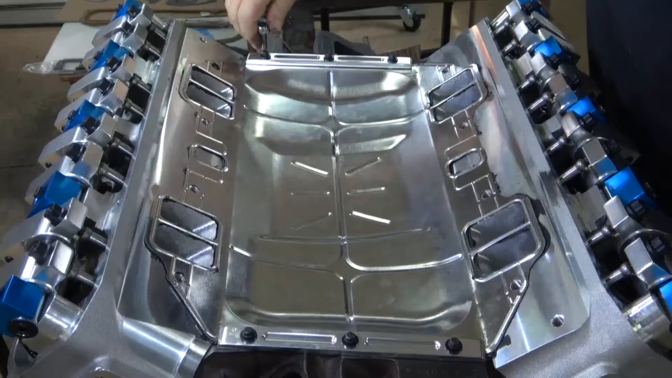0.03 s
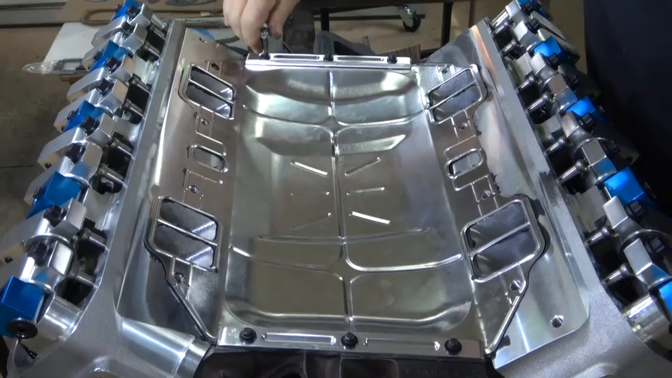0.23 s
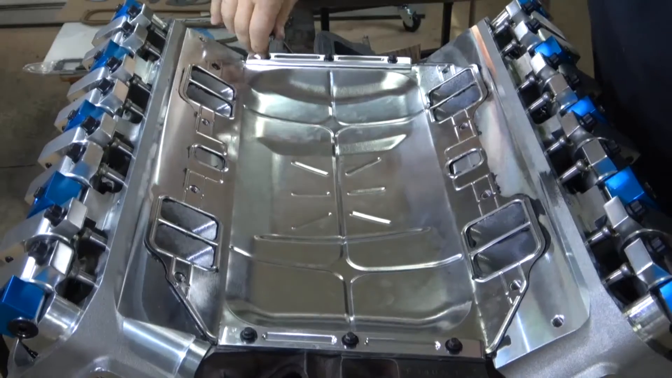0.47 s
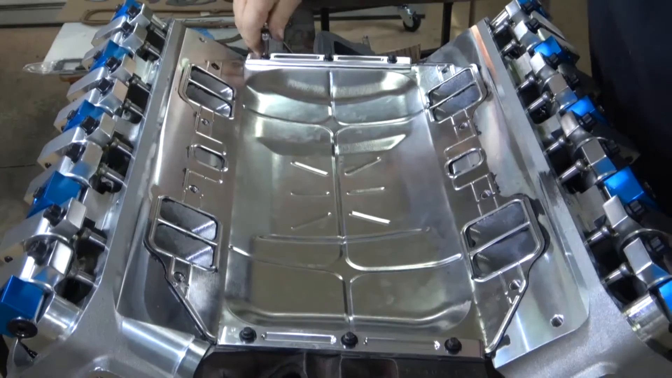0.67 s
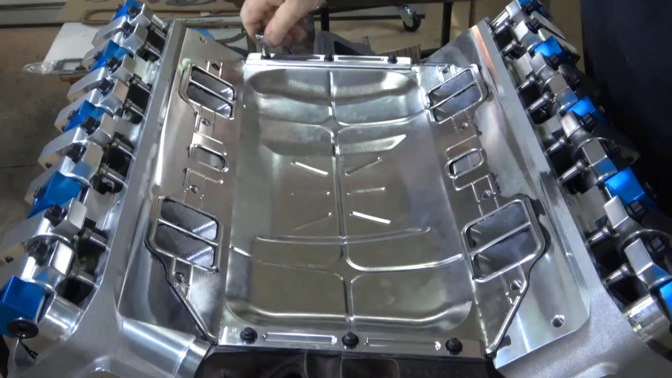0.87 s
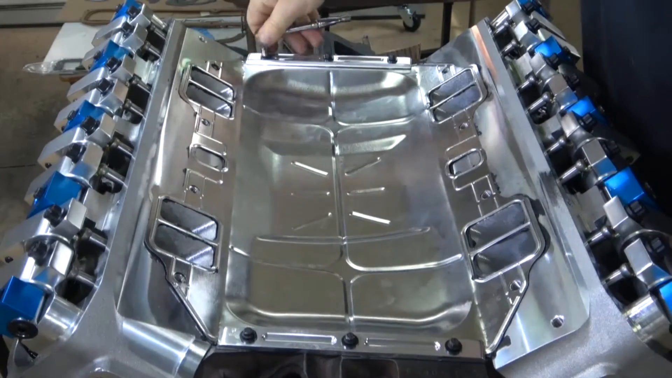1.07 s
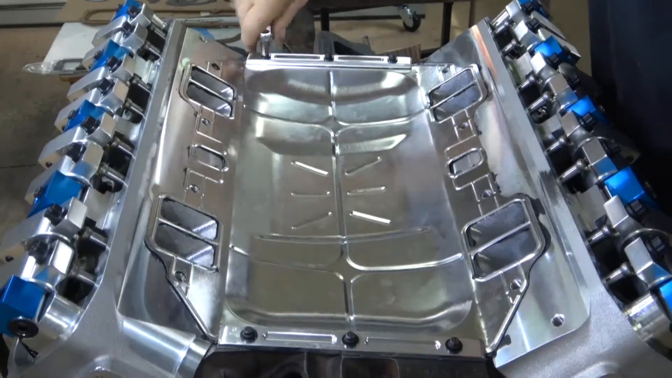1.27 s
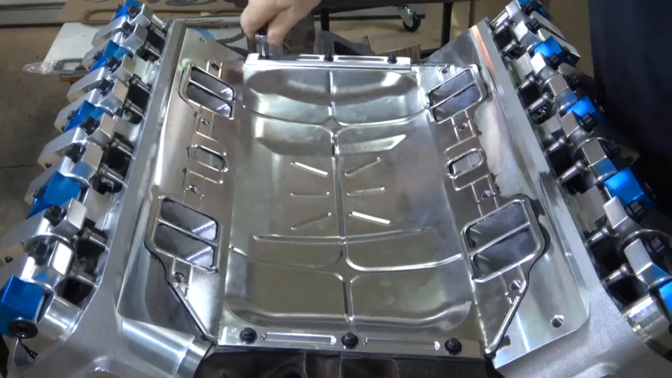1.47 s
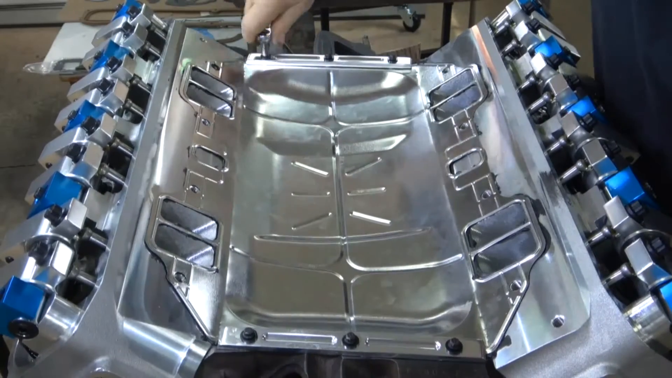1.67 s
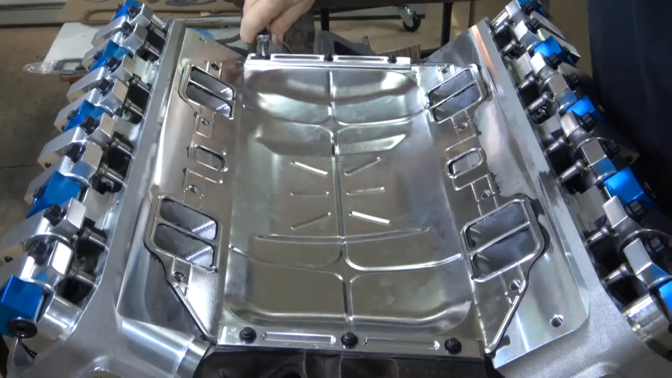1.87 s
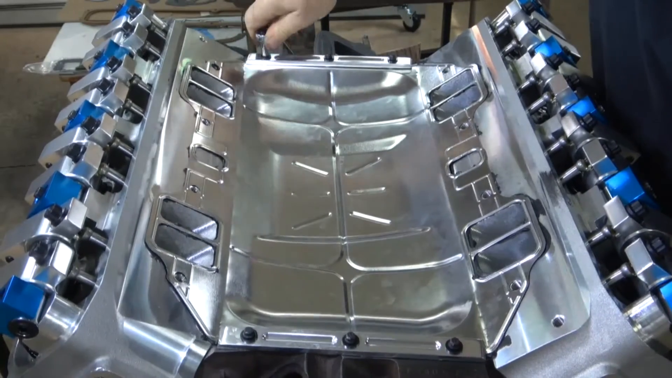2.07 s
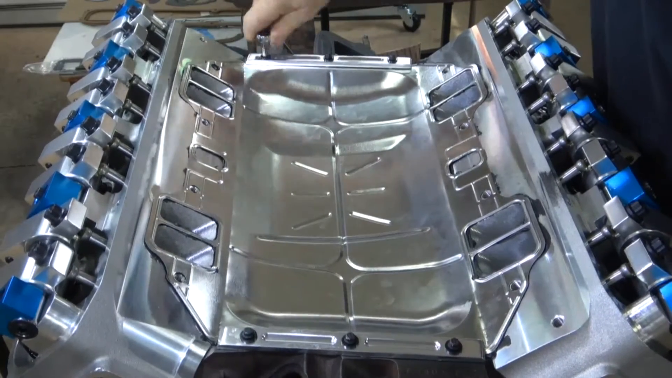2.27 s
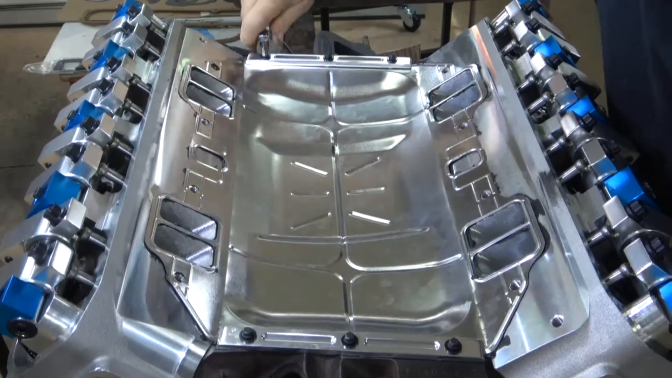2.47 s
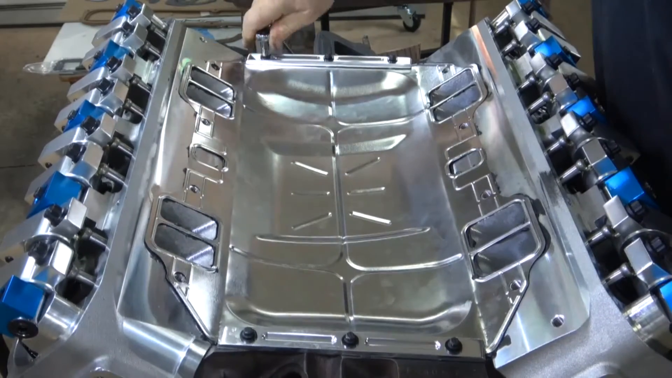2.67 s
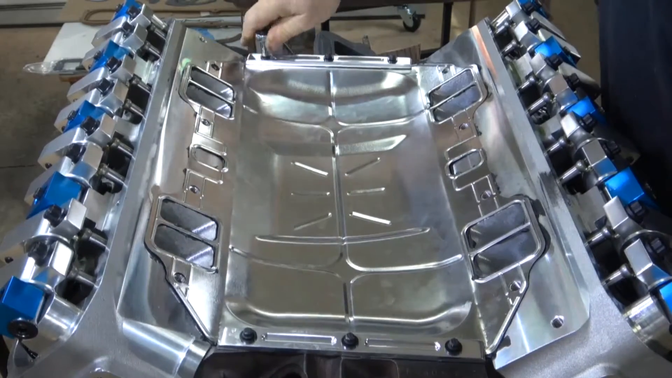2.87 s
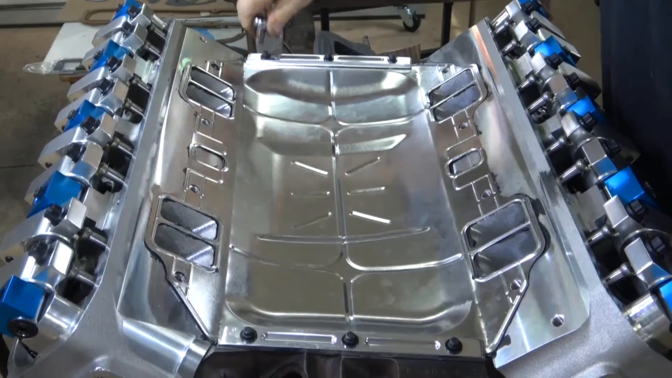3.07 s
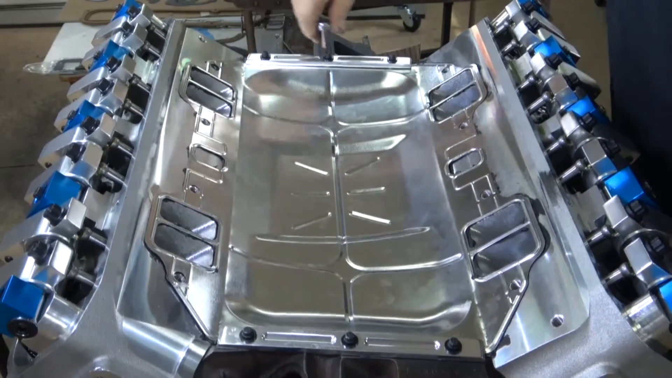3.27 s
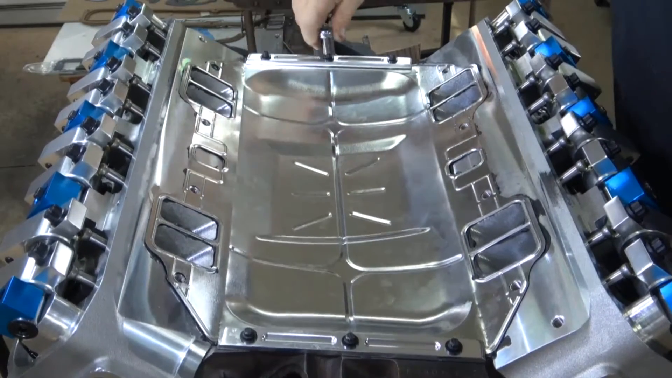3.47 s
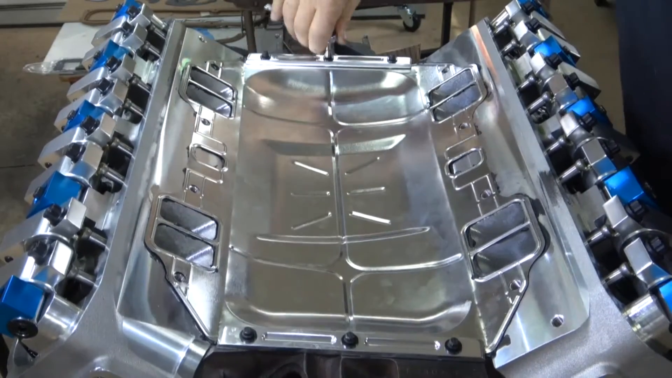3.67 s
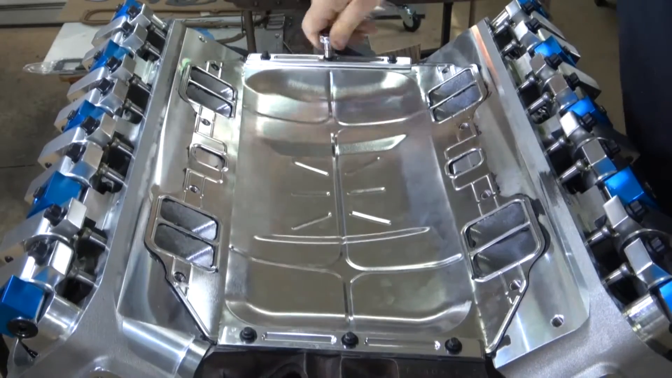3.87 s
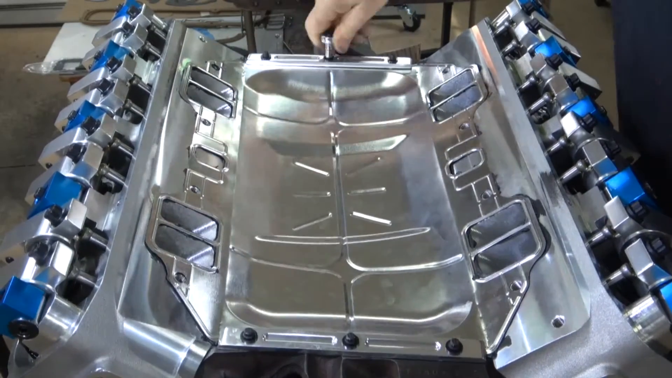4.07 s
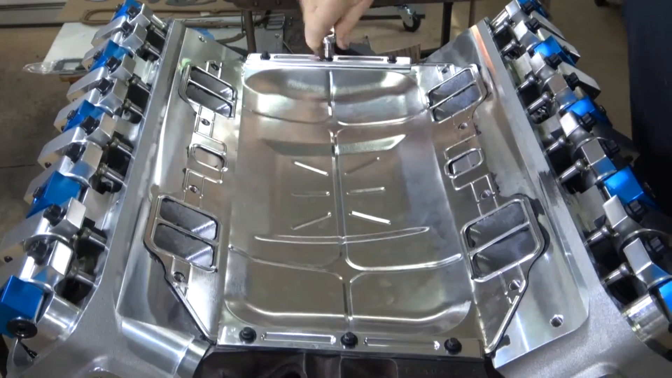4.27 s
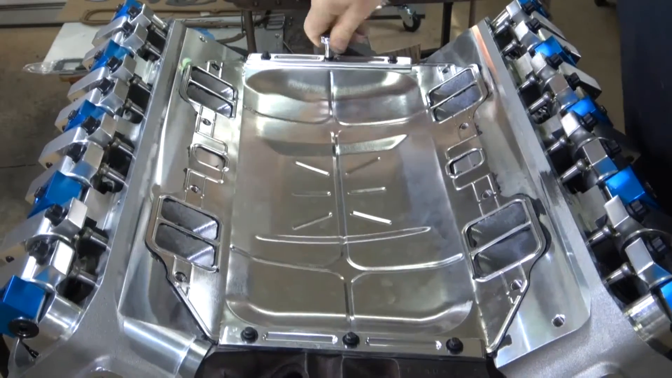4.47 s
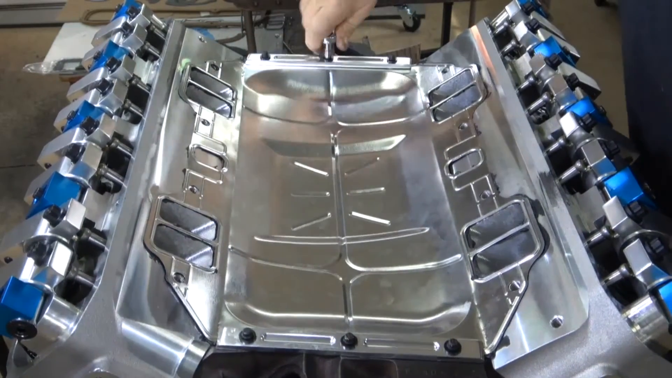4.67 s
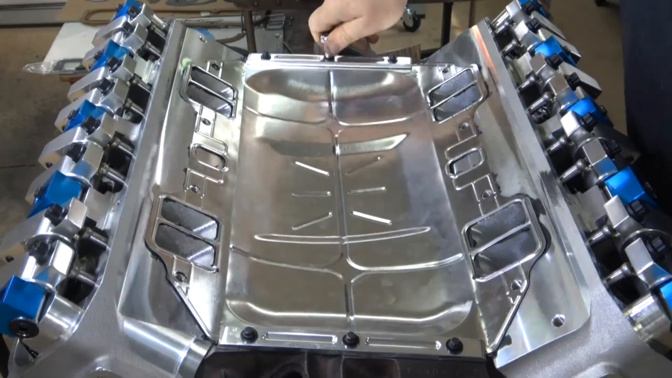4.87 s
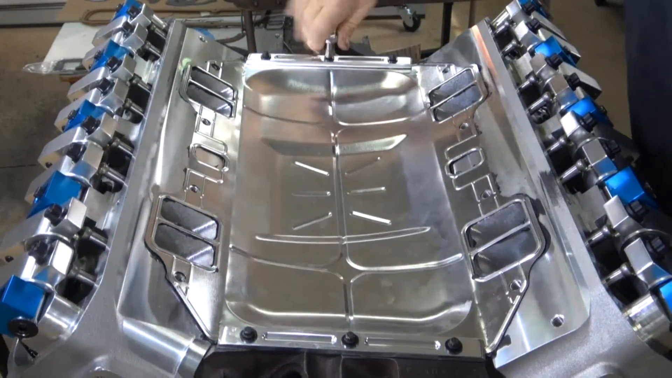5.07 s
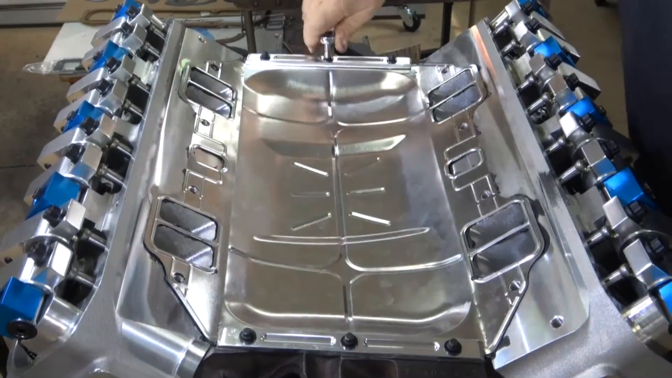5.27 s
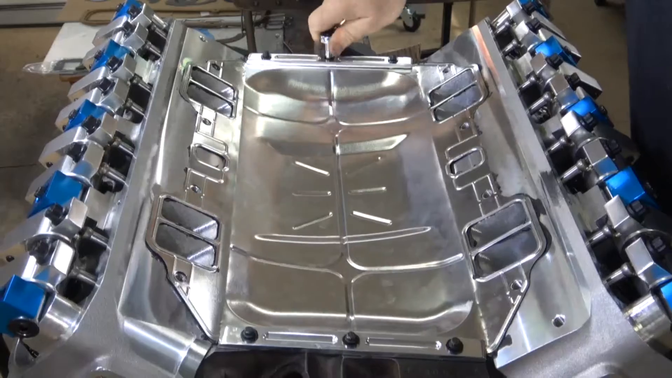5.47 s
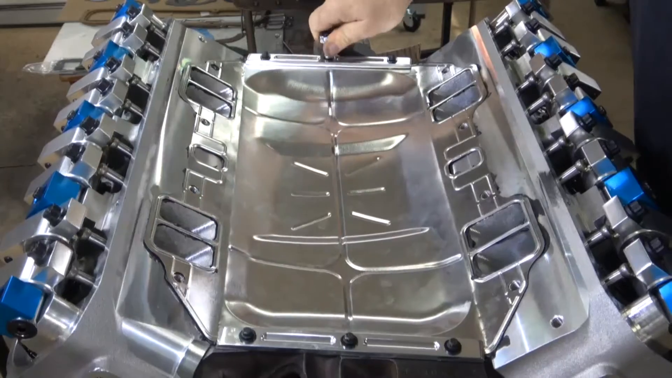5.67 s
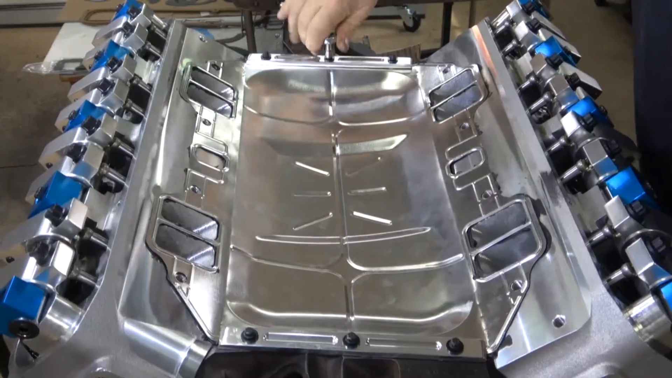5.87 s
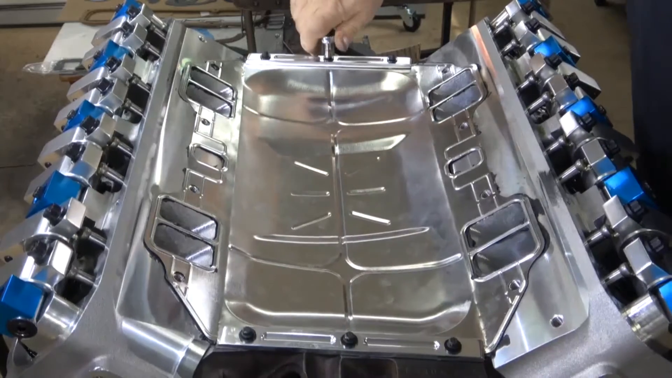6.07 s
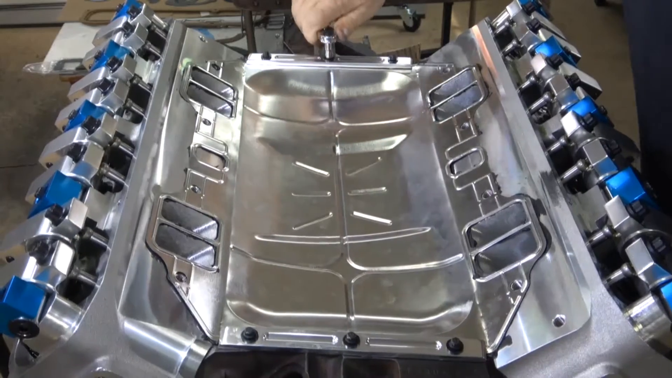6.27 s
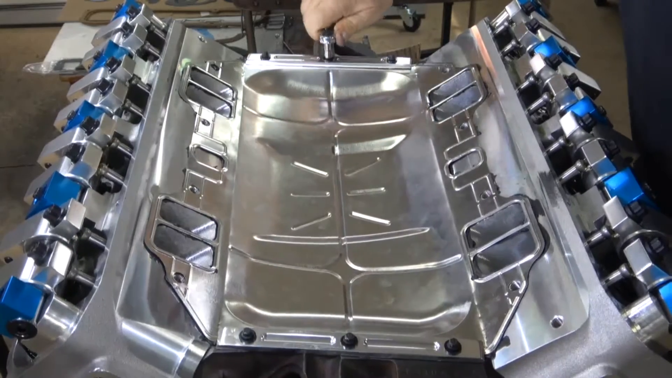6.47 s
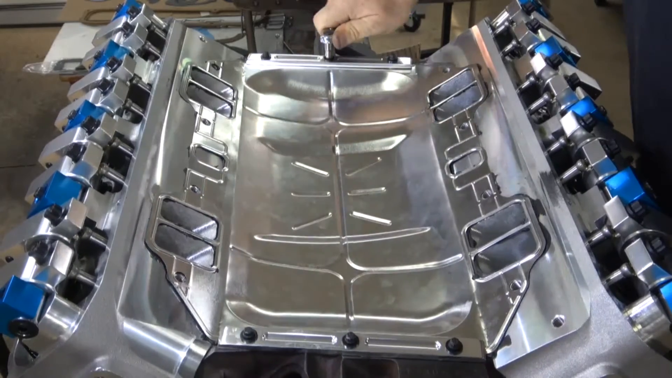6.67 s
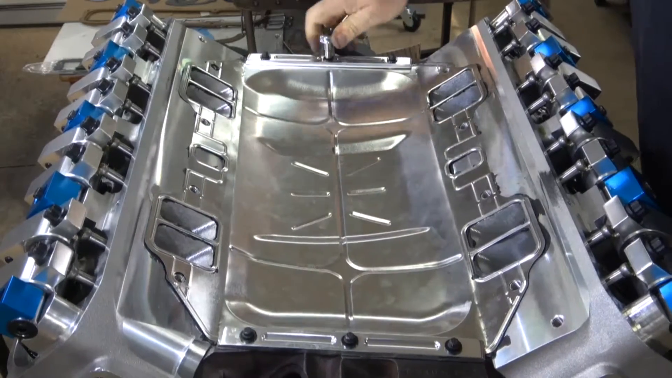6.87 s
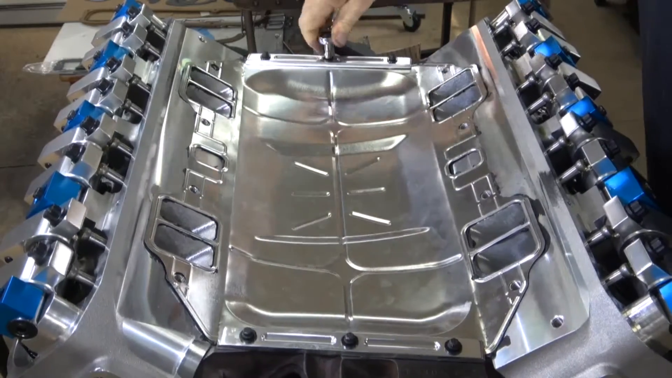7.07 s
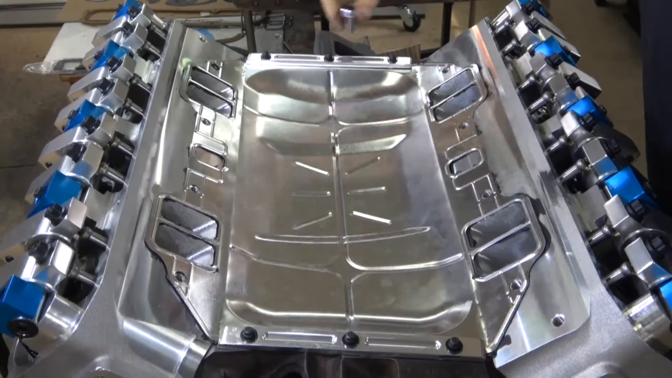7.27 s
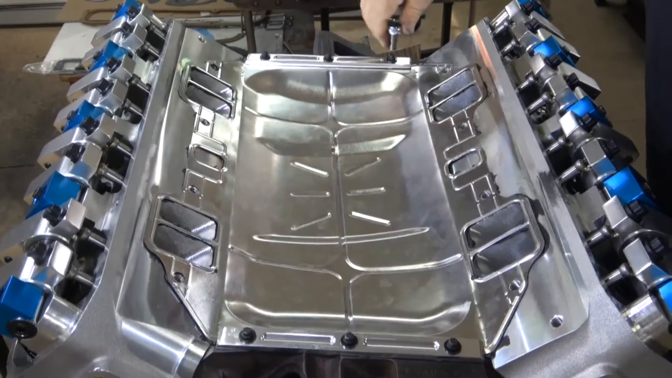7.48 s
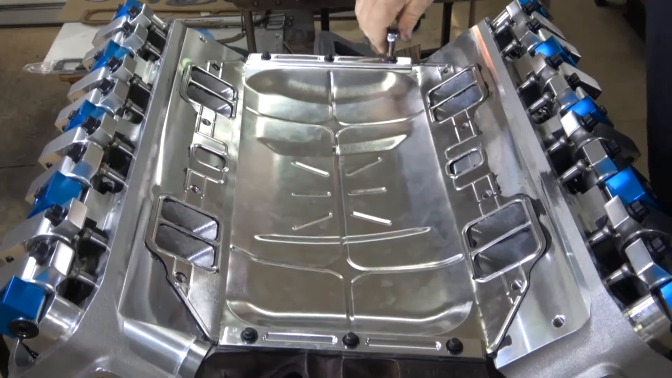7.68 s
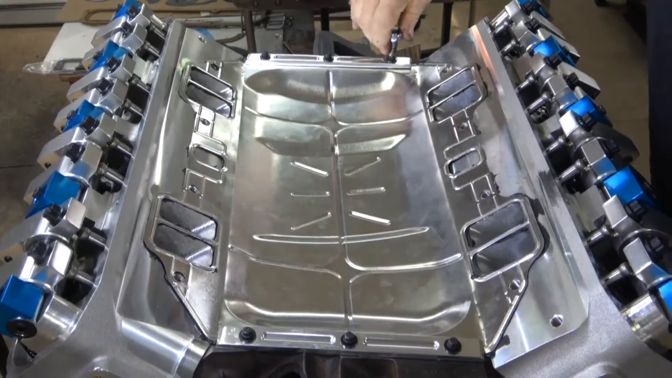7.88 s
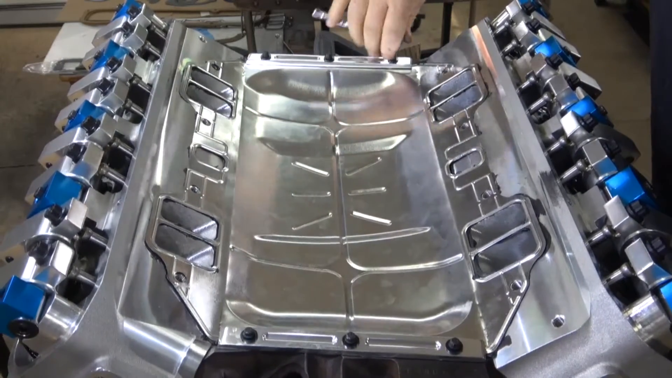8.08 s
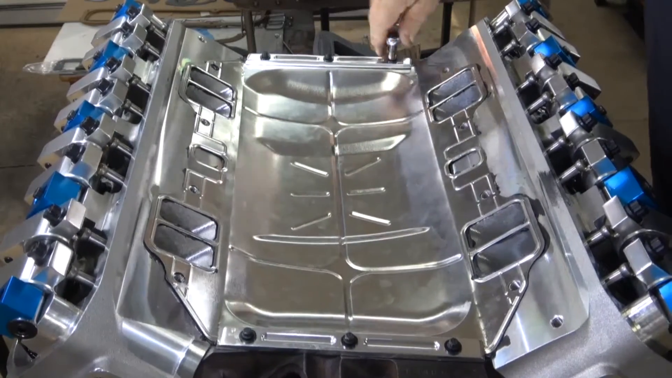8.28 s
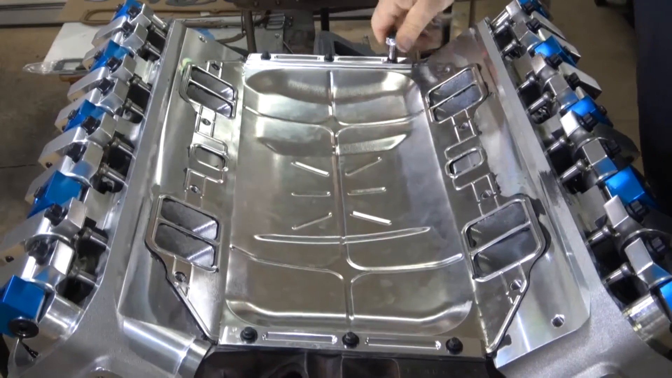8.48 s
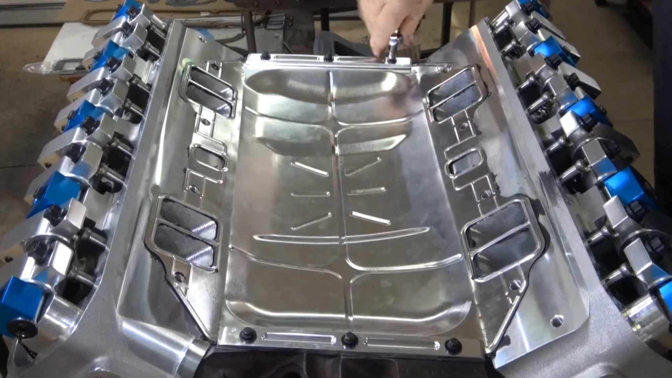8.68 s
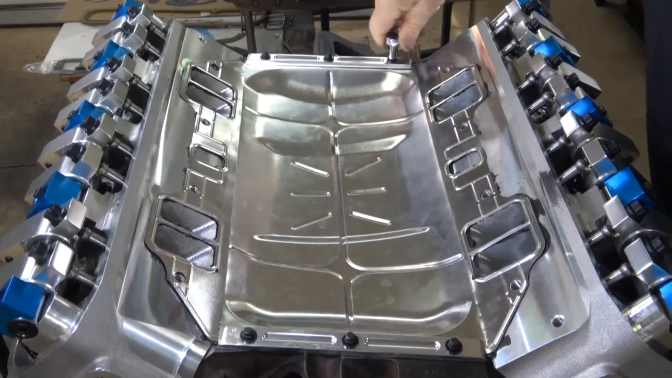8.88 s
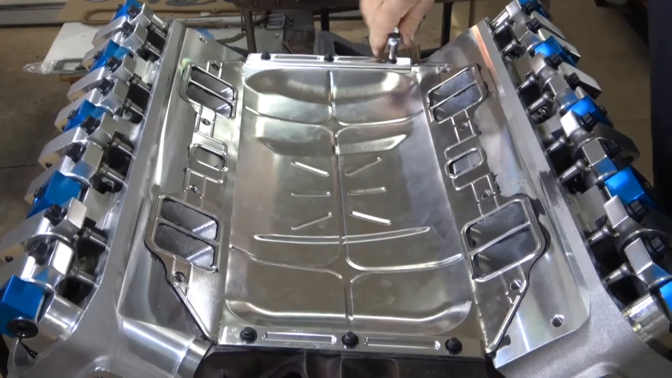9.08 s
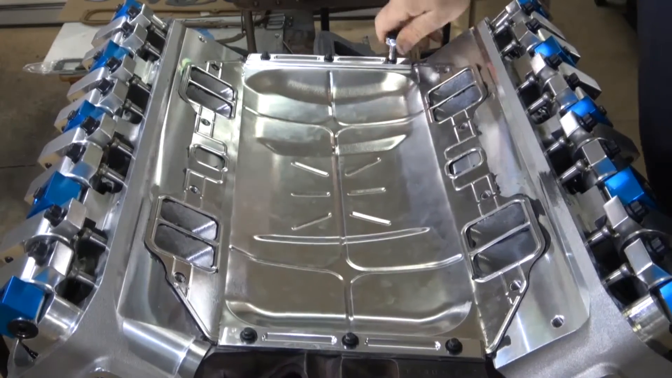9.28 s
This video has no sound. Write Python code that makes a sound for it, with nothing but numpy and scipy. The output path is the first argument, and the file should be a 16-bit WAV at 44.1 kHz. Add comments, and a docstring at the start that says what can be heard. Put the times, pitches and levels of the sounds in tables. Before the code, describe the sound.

Close to the microphone in a garage, a small hand ratchet tightens bolts on a metal engine block. The socket knocks and scuffs, then brief fast bursts of crisp pawl clicks come irregularly. One hard clank rings out about a third of the way through, followed by clustered knocks. A quieter gap comes later before knocking and clicking resume. Hiss, faint motor hum and low uneven rumble stay underneath.

```python
"""First comes the room: hiss, faint motor hum and an uneven low rumble from outside, with a socket knocking at
once. In a garage, close to the microphone, a small hand ratchet tightens bolts on a metal engine block. On each
back stroke the pawl snaps over a run of teeth; between strokes the socket knocks and scuffs on the bolt. Blows
ring a bank of steel modes and add crack and rattle noise; sparse echoes make the garage. The background is
shaped noise, sines and noise-driven low resonances; all is almost mono, with a faint left-right difference in
the treble."""
import sys
import numpy as np
from scipy import signal
from scipy.fft import rfft, irfft, next_fast_len
from scipy.io import wavfile
from scipy.ndimage import uniform_filter1d

SR = 44100
rng = np.random.default_rng(int(sys.argv[2]) if len(sys.argv) > 2 else 0)


def materialize(psi):
    """Save the field psi as 16-bit PCM at rate SR to the path in sys.argv[1].

    A 1-D psi becomes a single channel; in a 2-D psi each row is a channel.
    """
    bounded = np.clip(np.atleast_2d(psi).T, -1, 1)
    quanta = np.round(bounded * 32767).astype(np.int16)
    wavfile.write(sys.argv[1], SR, quanta)


N = 411894  # length [samples]


def gain_of(db):
    """Decibels to amplitude."""
    return 10 ** (np.asarray(db) / 20)


def evened(x):
    """Scales to rms 1 along time."""
    return x / np.sqrt(np.mean(x ** 2, -1, keepdims=True) + 1e-20)


def read(points, hz):
    """Reads a (frequency [Hz], value) table on a log-frequency axis."""
    f, value = np.transpose(points)
    return np.interp(np.log(hz + 1), np.log(f + 1), value)


def coloured(x, points):
    """Filters by a (frequency [Hz], level [dB]) table, without phase shift."""
    length = x.shape[-1]
    size = next_fast_len(length)
    gain = gain_of(read(points, np.fft.rfftfreq(size, 1 / SR)))
    return irfft(rfft(x, size) * gain, size)[..., :length]


def resonate(x, hz, width):
    """A resonance that may glide: shifts the curve hz down to zero, smooths, and shifts back."""
    turn = np.exp(2j * np.pi * np.cumsum(hz * np.ones(len(x))) / SR)
    r = np.exp(-np.pi * width / SR)
    smooth = signal.lfilter([1 - r], [1, -r], x / turn)
    return 2 * (turn * smooth).real


def wander(per_s):
    """Slow random curve of rms 1, a sum of sines up to per_s cycles a second."""
    t = np.arange(0, N + 256, 256) / SR
    speeds = per_s * np.geomspace(.05, 1, 24)
    waves = sum(np.sin(2 * np.pi * (f * t + rng.random())) / np.sqrt(f) for f in speeds)
    return np.interp(np.arange(N) / SR, t, evened(waves))


# Spectrum of air and microphone hiss: (frequency [Hz], relative density [dB per Hz])
HISS_SPECTRUM = [(25, -4.5), (55, 6), (100, -4.5), (220, -7), (400, -15), (700, -17.5), (1500, -23),
                 (3200, -26), (5000, -33.5), (11000, -36)]
HISS_DB, HISS_DRIFT_DB = -46, 0.8  # mean level, rms drift
# Faint hum of motor and mains, its steady tones: (frequency [Hz], mean level [dB])
HUM_TONES = [(58.5, -59.5), (240, -67), (329, -63), (439, -68), (897, -79), (1530, -76)]
# The motor's strongest overtone fades: (time [s], level [dB])
MOTOR_OVERTONE = [(0, -51), (1.1, -57), (2.3, -58.5), (9.34, -61)]
MOTOR_OVERTONE_HZ = 219.8
# Low rumble from outside: (time [s], boom pitch [Hz], relative boom level [dB])
RUMBLE_COURSE = [(0, 96, -74), (.3, 95, -44), (1.35, 87, -45), (1.5, 105, -57), (2, 119, -50.5),
                 (2.2, 94, -56), (4, 96, -46.5), (6.7, 93, -44.5), (6.901, 86.5, -44.5), (8.199, 85.5, -49),
                 (8.351, 93, -47.5), (9.34, 92, -46)]
# Dull thumps from outside: (time [s], relative boom level [dB])
OUTSIDE_THUMPS = [(2.148, -32), (2.437, -31), (2.726, -23), (2.995, -28.5), (3.33, -29.5), (3.66, -35),
                  (4.169, -31), (4.438, -36), (4.976, -32), (5.74, -36), (6.259, -38), (8.344, -36),
                  (8.931, -39)]
THUMP_RISE_S, THUMP_T60_S = 0.012, 0.45  # rise time constant, fall by 60 dB
# Low tones of the room above the boom: (frequency [Hz], width of each filter pass [Hz], relative level [dB])
ROOM_TONES = [(130, 14, 0), (173, 26, 0), (214.8, 17, -2), (261.3, 11, 0.5), (313, 22, -0.5)]
ROOM_TONES_DB, LUMPY_DB = -58.5, 1.6  # mean level of room tones; rms unevenness of boom and room tones
THUMP_ROOM_DB = -8.5  # gain of the thump envelope in the room tones, against the boom's


def hiss():
    """Air and microphone noise: shaped random noise that drifts slightly in level."""
    level = gain_of(HISS_DB + HISS_DRIFT_DB * wander(0.9))
    return level * evened(coloured(rng.standard_normal(N), HISS_SPECTRUM))


def motor_hum():
    """Steady sines wavering in level, and one overtone that follows a level curve."""
    t = np.arange(N) / SR
    hum = np.zeros(N)
    for hz, db in HUM_TONES:
        hum += gain_of(db + 0.53 * wander(0.72)) * np.sqrt(2) * np.sin(2 * np.pi * hz * t)
    overtone = np.sqrt(2) * np.sin(2 * np.pi * MOTOR_OVERTONE_HZ * t)
    return hum + gain_of(np.interp(t, *np.transpose(MOTOR_OVERTONE))) * overtone


def outside_rumble():
    """A gliding boom of tone and resonant noise, and the room's low tones; thumps swell both."""
    t = np.arange(N) / SR
    s, hz, db = np.transpose(RUMBLE_COURSE)
    after, starts = t[:SR // 2], np.zeros(N)
    swell = 0.75 * (1 - np.exp(-after / THUMP_RISE_S)) * gain_of(-60 * after / THUMP_T60_S)
    for at, thump_db in OUTSIDE_THUMPS:
        starts[round(at * SR)] = gain_of(thump_db)
    thumps = signal.oaconvolve(starts, swell)[:N]
    boom_size = gain_of(np.interp(t, s, db) + LUMPY_DB * wander(6.)) + thumps
    room_size = gain_of(ROOM_TONES_DB + LUMPY_DB * wander(7.3)) + gain_of(THUMP_ROOM_DB) * thumps
    boom_hz, noise = np.interp(t, s, hz), rng.standard_normal(N)
    tone = np.sqrt(2) * np.sin(2 * np.pi * np.cumsum(boom_hz) / SR)
    boom_noise = evened(resonate(resonate(noise, boom_hz, 28.0), boom_hz, 22.0))
    boom = 0.68 * tone + .5 * boom_noise
    room = np.zeros(N)
    for f, width, tone_db in ROOM_TONES:
        room += gain_of(tone_db) * evened(resonate(resonate(noise, f, width), f, width))
    return boom_size * boom + room_size * evened(room)


def background():
    """The bed heard from the start: hiss, motor hum and rumble from outside."""
    return hiss() + motor_hum() + outside_rumble()


# Where thud, handle ring, head ring and snap lie: (thud [Hz], handle [Hz], head [Hz], snap [Hz])
ZONES = (550, 1400, 3400, 8000)
# Modes of wrench, socket and block: (frequency [Hz], relative level [dB], t60 before extra damping [s])
STEEL_MODES = [(310, -3, 0.2), (379.5, -4.5, 0.1), (463, -2.5, 0.14), (588, 0, 0.06), (757, 6, 0.06),
               (877, -5, 0.12), (1128, 12, 0.035), (1285, -3, 0.19), (1341.6, 3, 0.12), (1680, -2.5, 0.15),
               (1810, 0.5, 0.12), (2060, -1, 0.1), (2280, -25, 0.23), (2334, -4, 0.18), (2900, 4.5, 0.022),
               (3180, -10, 0.16), (3200, -3, 0.18), (3280, -14, 0.033), (3420, 1, 0.13), (3770, -1.5, 0.16),
               (3800, -5, 0.084), (4066, 2.5, 0.035), (4470, -16.5, 0.15), (5024, -11.5, 0.054),
               (6186, -2, 0.032), (6770, -8, 0.23), (7364, -2, 0.031), (6950, -31.5, 0.071)]
# Countless small modes heard as noise, the sharp crack and the rattle after it: relative dB, t60 in s
CRACK_DB, CRACK_T60_S, RATTLE_DB, RATTLE_T60_S = 0., 0.0052, -10, 0.099
# While the parts still touch they damp each other: extra first swing over the free ring, and its t60
TOUCH_DB, TOUCH_T60_S = 4.3, 0.012


def steel_modes(t, damping):
    """Twelve versions of the decaying modes, each detuned by another grip."""
    hz, db, t60 = np.transpose(STEEL_MODES)[:, :, None]
    # each mode is a cluster of three near neighbours
    detuned = hz * (1 + 0.0144 * rng.standard_normal((3, 12, len(hz), 1)))
    swing = np.sin(2 * np.pi * (detuned * t + rng.random(detuned.shape))).sum(0) / np.sqrt(3)
    free = gain_of(db - 60 * damping * t / t60)
    touching = 1 + gain_of(TOUCH_DB - 60 * t / TOUCH_T60_S)
    # the ring swells over a few cycles as the blow spreads through the steel
    spread = 1 - np.exp(-t * hz / 1.45)
    return free * touching * spread * swing


def blows(rows, uneven_db, contact_ms, damping, rattle_db):
    """Rows (time, thud, handle, head, snap dB): each rings the steel, cracks and rattles."""
    size, lead = 3072, 128  # samples; the lead leaves room for the filters' pre-ringing
    t, out = np.arange(size) / SR, np.zeros(N + 3 * size)
    modes, mode_hz = steel_modes(t, damping), np.transpose(STEEL_MODES)[0]
    crack = gain_of(CRACK_DB - 60 * t / CRACK_T60_S)
    rattle = gain_of(RATTLE_DB - 60 * t / RATTLE_T60_S) * (1 - crack / crack[0])
    for s, thud_db, handle_db, head_db, snap_db in rows:
        colour = list(zip(ZONES, (thud_db, handle_db, head_db, snap_db)))
        where, grit, noise = rng.standard_normal((3, size))
        # every blow lands elsewhere, so the modes are stirred unevenly
        stirred_db = read(colour, mode_hz) - 14.0 + uneven_db * where[:len(mode_hz)]
        stirred = np.sign(where[-len(mode_hz):]) * gain_of(stirred_db)
        snap_colour = [(1500, snap_db - 10.5), (5000, snap_db), (10500, snap_db + 2.0)]
        snap = coloured(np.roll(np.sign(noise) * crack, lead), snap_colour)
        shake_colour = [(200, thud_db - 24.5)] + colour[:-1]
        shake_colour += [(4300, head_db - 1.0), (5300, snap_db - 1.5), (10500, snap_db - 9.5)]
        shake = coloured(np.roll(noise * rattle, lead), shake_colour)
        ring = np.roll(stirred @ modes[rng.integers(len(modes))], lead) + 1.31 * snap
        # the contact: one main impact and a cluster of small ones
        contact = 0.8 * (abs(grit) > 2.2) * np.sign(grit) * np.exp(-t * 1000 / contact_ms)
        contact[0] = 1
        sound = signal.fftconvolve(ring, contact / np.linalg.norm(contact))
        sound[:size] += gain_of(rattle_db) * shake
        at = size + round(s * SR) - lead
        out[at:at + len(sound)] += sound
    return out[size:size + N]


# Socket against bolt; levels stand before the common socket gain:
# (time [s], handle ring [dB], brightness [dB], thud over the handle ring [dB])
SOCKET_KNOCKS = [(0.003, -22.5, -5.5, -22), (0.04, -36.5, 3, -19), (0.18, -16, -34, -27),
                 (0.197, -29.5, -27, 6), (0.351, -33.5, -3.5, -9.5), (0.404, -38.5, -5, -43),
                 (0.577, -23, -21.5, -15), (0.615, -24.5, -19, -4), (0.644, -18.5, -3, 0),
                 (0.767, -25.5, -2.5, -21), (0.832, -30, -11, -30), (1.091, -34, -14, -26),
                 (1.155, -24, -3.5, 0), (1.675, -28, -8, -4), (1.697, -21, 9.5, -31), (1.866, -30.5, -1, 6),
                 (1.884, -36, -12, -3), (2.29, -22.5, -7, -30), (2.3, -19.5, 2, -6.5),
                 (2.476, -33.5, 3.5, 6), (3.054, -41, 19, 6), (3.08, -35, 9.5, -22),
                 (3.43, -0.5, -9.5, -30), (3.467, -11.5, -6, -17.5), (3.484, -15, -20, -18),
                 (3.546, -22, -18, -28), (3.584, -17.5, -14, -13), (3.635, -16.5, -10, -1),
                 (3.648, -10, -13, 0), (3.661, -9.5, -5.5, 2.5), (3.813, -21.5, -13, 0),
                 (3.884, -27, -11, -19), (3.921, -23.5, -11, -3), (4.031, -25, -9, -7),
                 (4.06, -28, -11, 6.5), (4.251, -9.5, -21, -9), (4.262, -13, -0.5, -10),
                 (4.282, -15.5, -25, 2.5), (4.527, -15, -12, -10), (4.513, -39.5, -15, -18),
                 (5.026, -28, -6, -12), (5.04, -16.5, -10, -11), (5.165, -27, -10, -25),
                 (5.233, -20, -9.5, 1.5), (5.797, -28.5, -9, -11), (5.939, -22.5, -12, -13),
                 (5.787, -36, -15, 3), (7.007, -27, -17, -26), (7.034, -40, -26, -25),
                 (7.152, -30.5, -5, -25), (7.736, -16.5, -28, -18), (7.753, -13.5, -14.5, -19),
                 (7.875, -25, -4, -5), (7.888, -27.5, 1.5, -24), (7.904, -30.5, 0, -8),
                 (8.042, -15.5, -7, -10.5), (8.13, -23.5, -8, -4), (8.142, -24.5, -1.5, -2.5),
                 (8.206, -37, 5, 6), (8.505, -31, -4, -24), (8.523, -17, 1, -8), (8.705, -22, 6.5, -1.5),
                 (8.91, -16.5, -8.5, -20), (8.926, -20, 5, -8), (9.082, -20, 6, 0)]
# Brightness lifts the head ring one for one, the snap by this share; the snap starts from its level over the ring
DULL_SNAP_DB, SNAP_SHARE = -18.5, 0.85
# The socket seats or the play in the drive closes, edge on edge; levels before the common socket gain:
# (time [s], handle ring [dB], and over it: head ring [dB], snap [dB], thud [dB])
SOCKET_CLACKS = [(0.142, -14, 3, -3.5, -17), (0.631, -8, -1.5, -13.5, -30), (1.401, -18.5, -1, -11, 9),
                 (2.438, -29.5, 4, 3.5, -23), (3.697, -15.5, 0.5, -8.5, -5), (4.542, -11.5, -4.5, -13, -23),
                 (4.682, -21.5, 3.5, -13, 1), (5.966, -22, 1.5, -5, 6), (7.168, -30, 11.5, 6, -34),
                 (7.684, -17, 3.5, -10, -14), (8.362, -36, -1, 1.5, -1), (8.387, -30, -6, -8.5, -15)]


def socket():
    """Dull knocks, long in contact, and sharp short clacks of the socket on the bolt head."""
    dull = []
    for s, db, bright, thud in SOCKET_KNOCKS:
        snap_db = db + DULL_SNAP_DB + SNAP_SHARE * bright
        dull.append((s, db + thud, db, db + bright, snap_db))
    sharp = [(s, db + thud, db, db + head, db + snap) for s, db, head, snap, thud in SOCKET_CLACKS]
    knocks = blows(dull, uneven_db=2.5, contact_ms=4.76, damping=1.63, rattle_db=7.0)
    clacks = blows(sharp, uneven_db=1.5, contact_ms=1.64, damping=1.7, rattle_db=6.0)
    return gain_of(1.5) * (knocks + clacks)  # common socket gain


# How long the garage echoes last: (frequency [Hz], t60 [s])
GARAGE_DECAY = [(300, 0.63), (800, 0.55), (2100, 0.44), (4000, 0.62), (9000, 0.4)]
GARAGE_DB, TURNS_PER_S = -12, 9.  # echo gain; cycles of the three echo patterns' shares


def garage(x):
    """Sparse echoes, each band dying at its own speed; three patterns take turns, so the tail flutters slightly."""
    at = np.arange(200, SR // 2 - 20, 20)  # one echo in every 20 samples
    out, turn = np.zeros(N), 2 * np.pi * TURNS_PER_S * np.arange(N) / SR
    for k in range(3):
        taps = np.zeros(SR // 2)
        taps[at + rng.integers(0, 20, len(at))] = rng.choice([-1., 1.], len(at))
        hz, t, z = signal.stft(taps, SR, nperseg=256)
        fading = gain_of(-60 * t / read(GARAGE_DECAY, hz)[:, None])
        tail = signal.istft(z * fading, SR, nperseg=256)[1]
        share = np.sqrt(2 / 3) * np.cos(turn + k * np.pi / 3)  # the squares sum to 1
        out += signal.fftconvolve(x * share, tail / np.linalg.norm(tail))[:N]
    return gain_of(GARAGE_DB) * out


# Swing of each back stroke: (first tooth time [s], lasts [s], speed at start [teeth/s],
# speed at end [teeth/s], extra speed in mid swing [teeth/s])
BACK_SWINGS = [(1.1788, .176, 71, 79, 37), (1.7083, .0773, 180, 0, 45), (2.3151, .079, 150, 68, 35),
               (4.0816, .15, 87, 87, 76), (4.552, .0902, 135, 0, 97), (5.0554, .088, 152, 62, 51),
               (5.8153, .104, 142, 5, 36), (8.5407, .1565, 120, 0, 90), (8.942, .1189, 178, 0, 52)]
# Grip in each swing: (snap [dB], and over it: head ring at start [dB], at end [dB],
# extra in mid swing [dB], handle ring [dB], thud [dB])
SWING_GRIPS = [(-19.5, 9.5, 4, 0.5, 3, -5), (-18.5, 10.5, 1, -4, -7.5, -22), (-22, 8, -1.5, 3.5, -7.5, -22),
               (-18.5, 2.5, -.5, 6, -0.5, -21), (-17.5, 11.5, 2.5, -1, -4.5, -16),
               (-18.5, -4, -5, 8, -8, -20.5), (-19.5, -4, -2, -2, -11, -14.5), (-21, 10, 0.5, 5.5, .5, -21),
               (-21, 16, -4, 5.5, -1.5, -23.5)]
SNAP_SPREAD_DB, RING_SPREAD_DB = 3, 2.1  # teeth differ in how hard they snap and how much they ring


def ratchet():
    """A tooth snaps each time the swing turns the gear one tooth on; the grip sets how head and handle join in."""
    rows = []
    for swing, grip in zip(BACK_SWINGS, SWING_GRIPS):
        s, lasts, first, last, mid = swing
        db, start_db, end_db, mid_db, handle_db, thud_db = grip
        along = np.arange(0, lasts, 1 / SR) / lasts
        arch = np.sin(np.pi * along)
        turned = np.cumsum(first + (last - first) * along + mid * arch) / SR  # teeth passed
        at = np.searchsorted(turned, np.arange(turned[-1]))
        snap, ring = rng.standard_normal(size=(len(at), 2)).T
        ring_db = db + RING_SPREAD_DB * ring
        head_db = start_db + (end_db - start_db) * along[at] + mid_db * arch[at]
        snap_db = db + SNAP_SPREAD_DB * snap
        rows += zip(s + at / SR, ring_db + thud_db, ring_db + handle_db, ring_db + head_db, snap_db)
    return blows(rows, uneven_db=1.5, contact_ms=0.22, damping=1.3, rattle_db=5.5)


# Sleeve and fingers rub on metal: (start time [s], lasts [s], relative level [dB], band frequency [Hz])
METAL_RUBS = [(3.631, 0.045, -27, 900), (6.349, 0.24, -51, 700), (7.73, 0.091, -37, 1040),
              (8.235, 0.11, -50.5, 1070), (8.723, 0.19, -41, 495)]


def rubs():
    """Gritty noise in a wide band, quick to rise and slow to fade."""
    out = np.zeros(N)
    for s, lasts, db, hz in METAL_RUBS:
        u = np.linspace(0, 1, round(lasts * SR))
        unevenness = evened(uniform_filter1d(rng.standard_normal(len(u)), 90))
        grit = rng.standard_normal(len(u)) * gain_of(1.4 * unevenness)
        band_shape = [(hz / 3, -18), (hz / 1.17, 0), (hz * 0.99, 0), (hz * 4, -16), (hz * 8, -34)]
        band = evened(coloured(grit, band_shape))
        out[round(s * SR):][:len(u)] += gain_of(db) * band * 4.6 * np.sqrt(u) * (1 - u)
    return out


# Faint difference between left and right, stronger in the treble; side against middle: (frequency [Hz], level
# [dB])
LEFT_RIGHT_DIFFERENCE = [(60, -40), (300, -24), (2800, -32.5), (5000, -15.5), (10000, -11)]


def scene():
    """All sources together, almost mono, with a faint left-right difference from a phase-scrambled copy."""
    steel = ratchet() + socket() + rubs()
    middle = steel + garage(steel) + background()
    z = signal.stft(middle, nperseg=512)[2]
    random_phase = np.exp(2j * np.pi * rng.random(z.shape))
    scattered = signal.istft(z * random_phase, nperseg=512)[1][:N]
    side = coloured(scattered, LEFT_RIGHT_DIFFERENCE)
    return np.array([middle + side, middle - side])


ROLL_OFF_HZ, EDGE_HZ = 11000, 12263  # treble roll-off and final band limit


def record(dry):
    """Bass cut, treble roll-off, ceiling near full scale and band limit of the recorder."""
    bass_cut = signal.butter(2, 26., "high", fs=SR, output="sos")
    roll_off = signal.cheby1(15, .5, ROLL_OFF_HZ, fs=SR, output="sos")
    rolled = signal.sosfilt(roll_off, signal.sosfilt(bass_cut, dry))
    held = np.clip(rolled, -.95, .95)
    band_limit = signal.firwin(511, EDGE_HZ, window=("kaiser", 9), fs=SR)
    return signal.oaconvolve(held, band_limit[None], "same")


dry = scene()
out = record(dry)
materialize(out)
```